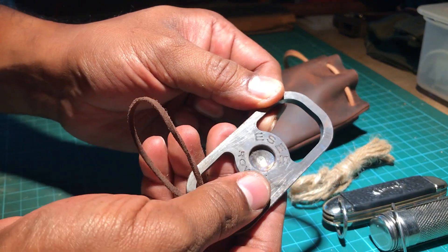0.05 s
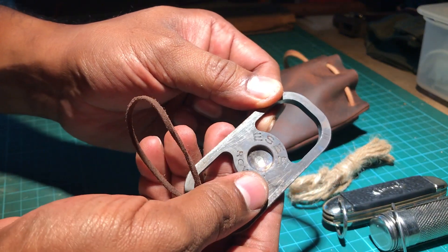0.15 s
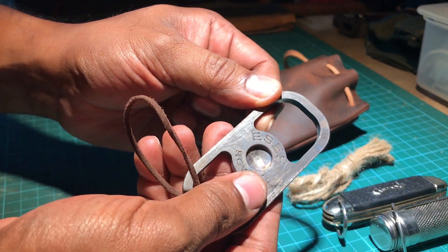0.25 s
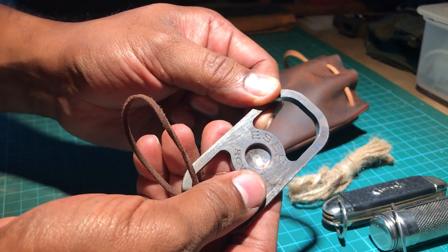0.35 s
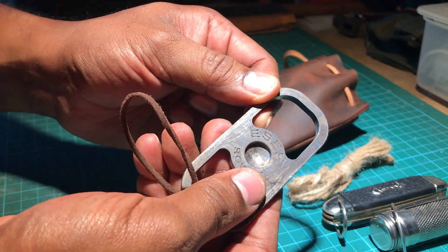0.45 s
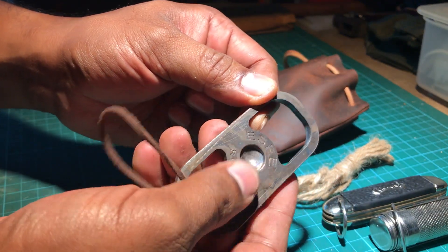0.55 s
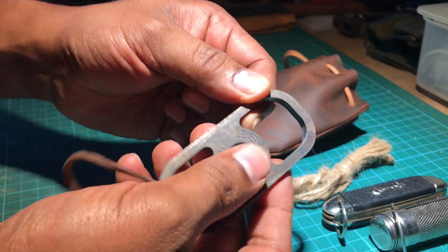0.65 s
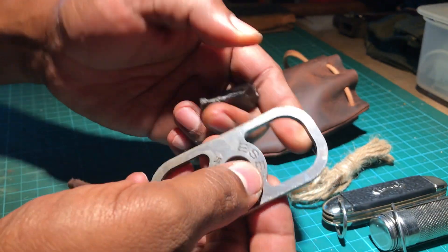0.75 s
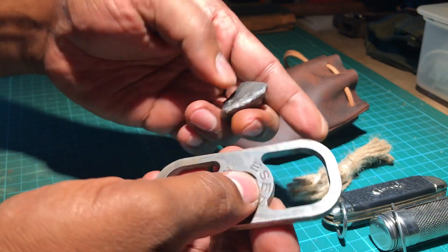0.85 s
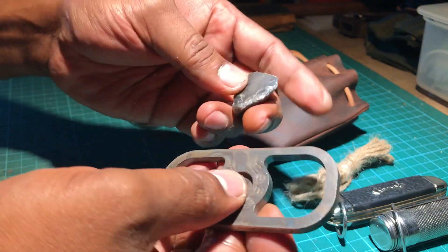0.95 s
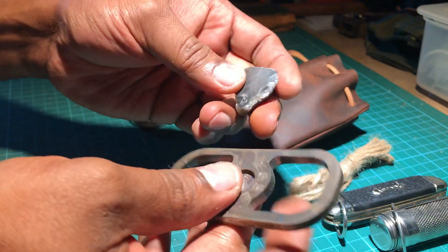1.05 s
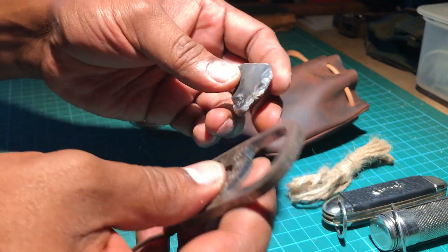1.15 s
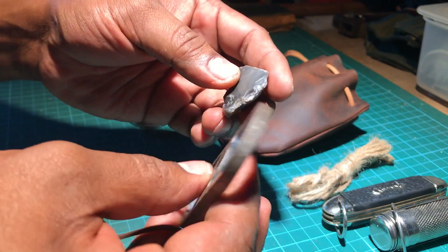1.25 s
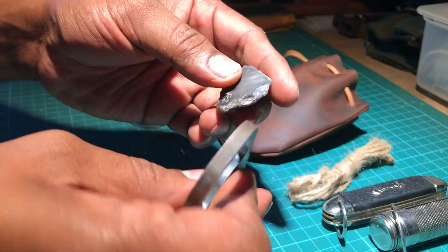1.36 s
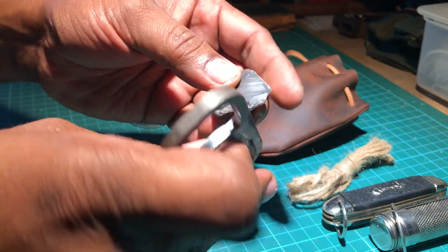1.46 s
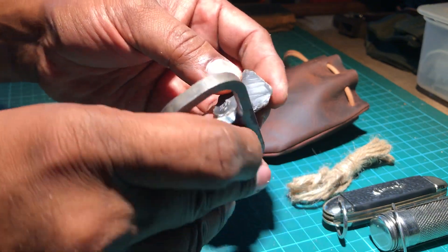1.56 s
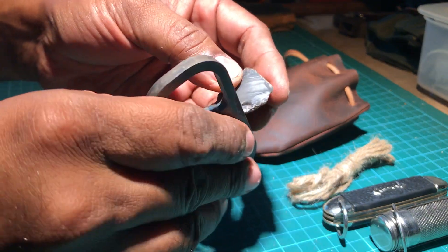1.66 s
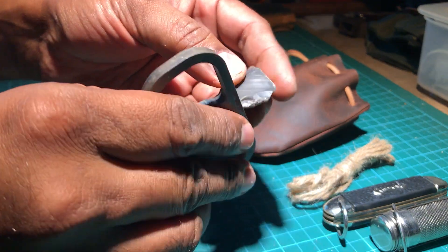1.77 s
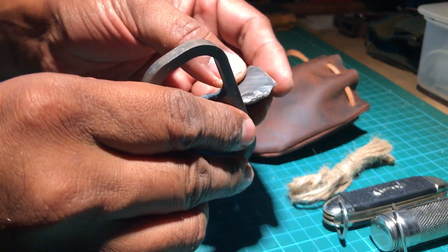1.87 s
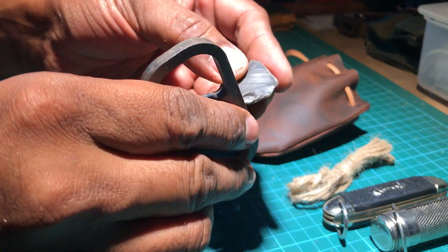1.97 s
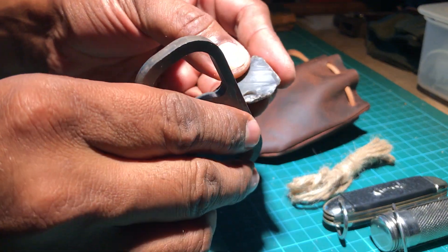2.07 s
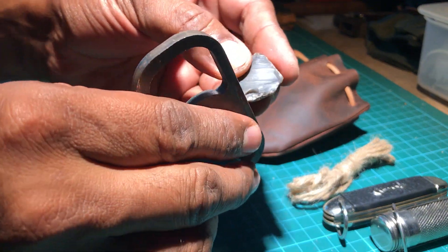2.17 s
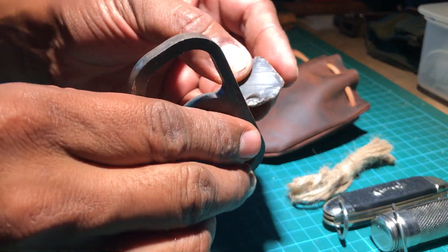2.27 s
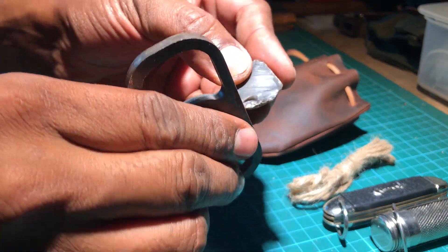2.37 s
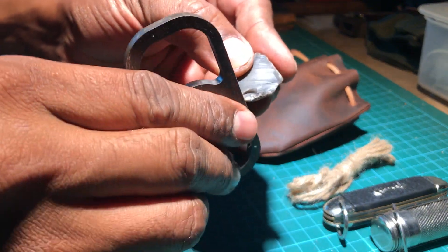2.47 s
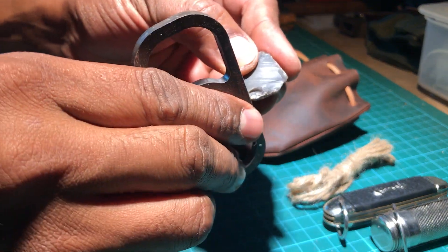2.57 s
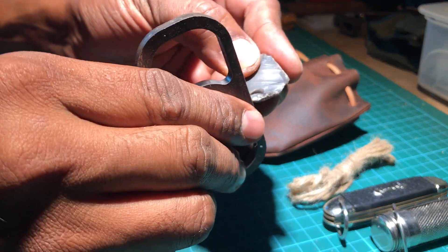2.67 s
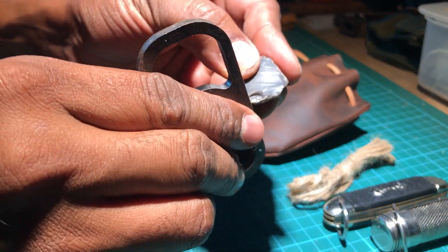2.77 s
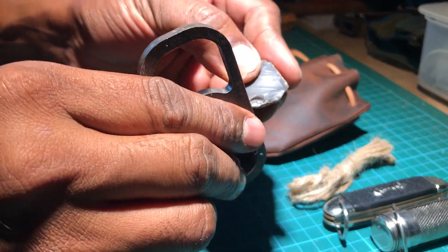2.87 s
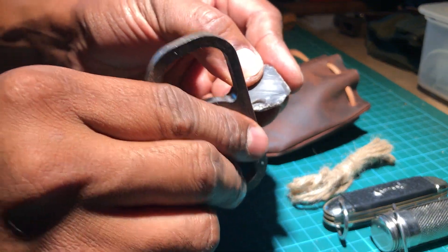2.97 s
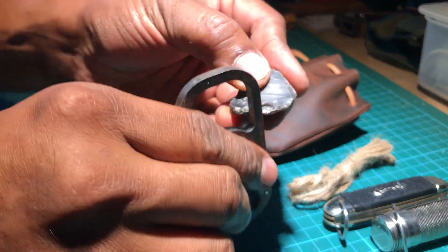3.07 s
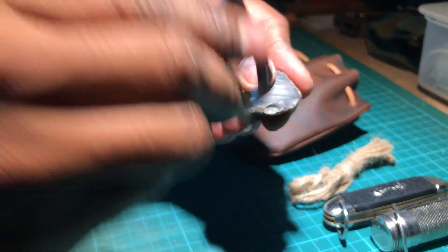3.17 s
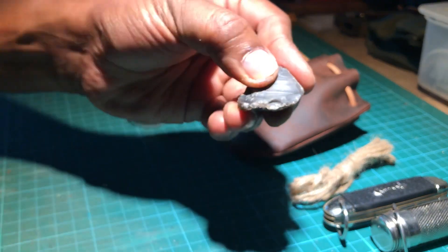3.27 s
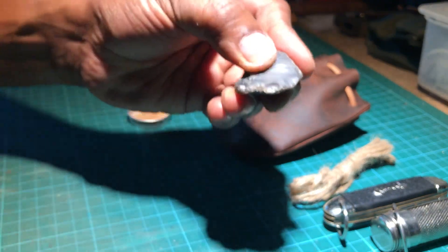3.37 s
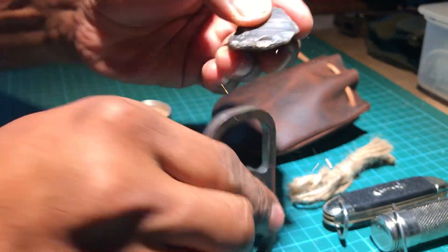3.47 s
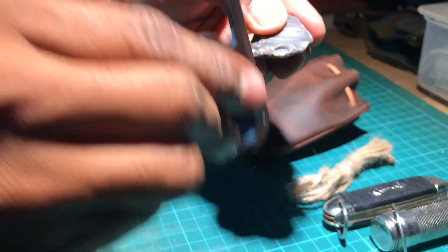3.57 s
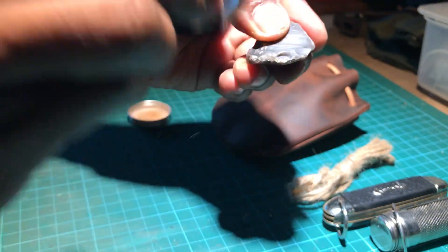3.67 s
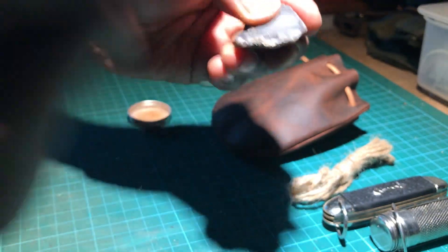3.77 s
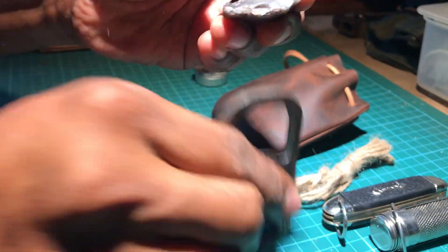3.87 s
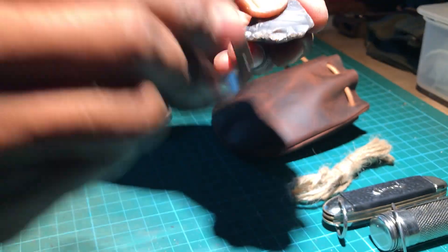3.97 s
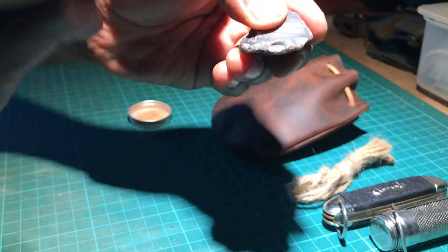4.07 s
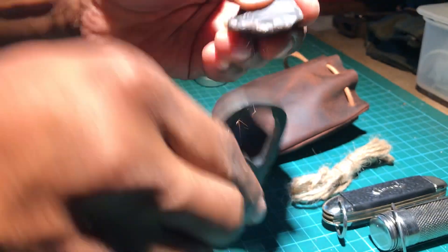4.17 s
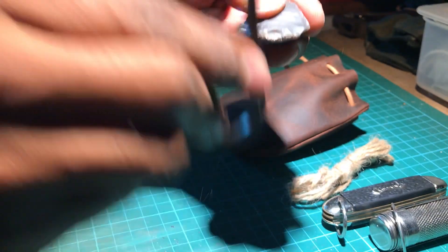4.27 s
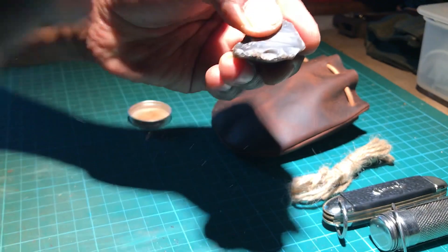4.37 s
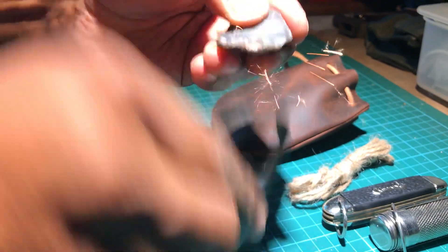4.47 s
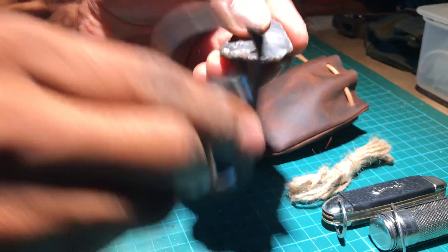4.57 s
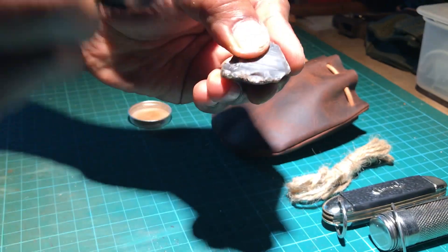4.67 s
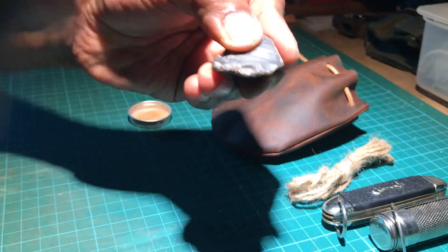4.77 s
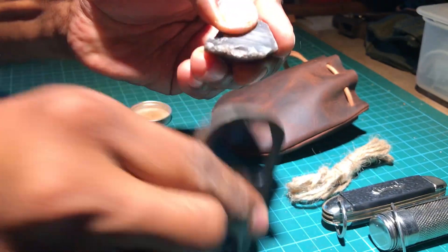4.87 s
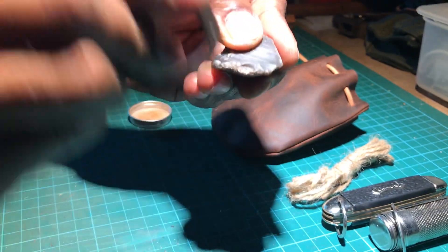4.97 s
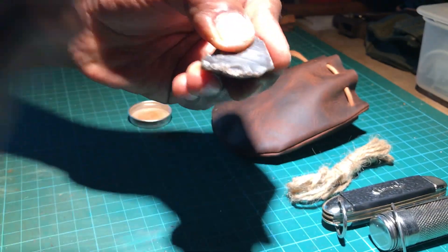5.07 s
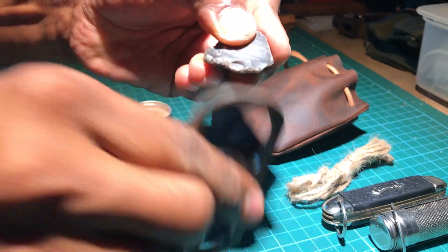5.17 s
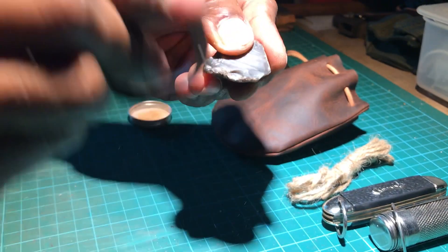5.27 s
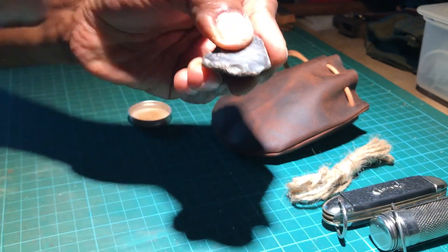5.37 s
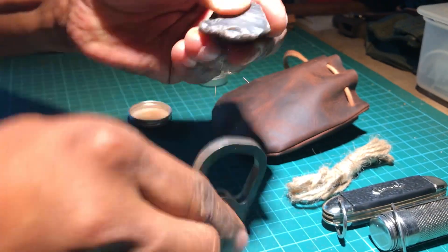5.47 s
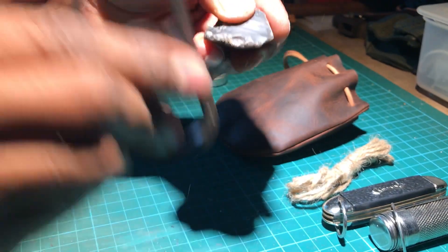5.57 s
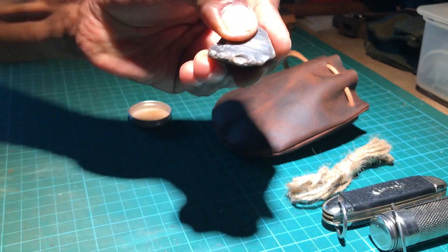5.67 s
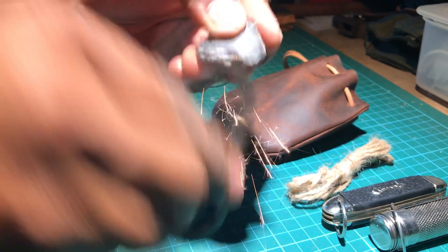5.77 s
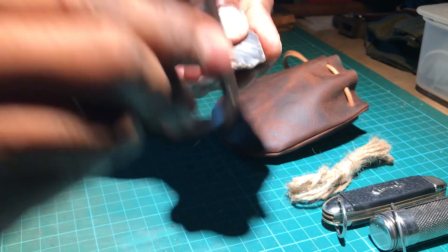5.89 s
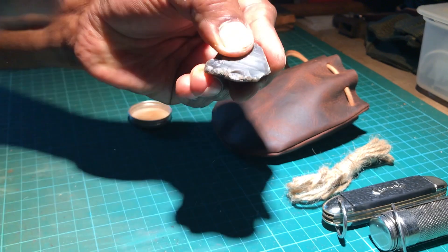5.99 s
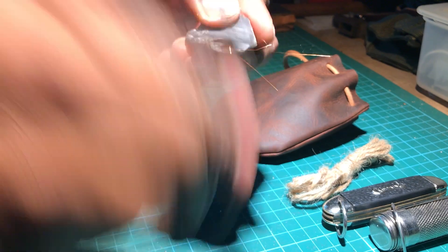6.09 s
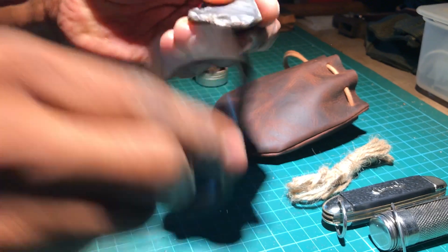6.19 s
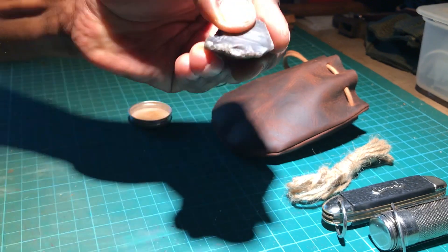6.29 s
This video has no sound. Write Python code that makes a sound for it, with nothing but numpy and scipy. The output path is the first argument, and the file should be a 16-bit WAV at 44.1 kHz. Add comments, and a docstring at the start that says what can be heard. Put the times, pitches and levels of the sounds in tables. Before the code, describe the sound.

A very close microphone in a small quiet room with a low rumble, faint hiss and tiny regular ticking. Hands shift softly, a steel striker touches a piece of flint with small clinks, then rubs it once briefly. After a short pause come nine loud, steady strikes, each a hard bright click with a gritty scrape and short metallic ring, fading quickly into slight room echo.

```python
"""Filtered noise gives a low rumble, faint hiss and thin wavering tones; short clicks give a regular tick.
From 0.6 s hands rustle (noise bursts); light touches of a steel striker on flint ring damped modes,
with a small room answering; at 3 s comes one slow rub (rough force under changing pressure).
From 3.5 s nine close strikes bite, scrape and snap free, with a thud and then a lump of moving air.
A limiter holds the peaks throughout."""
import sys
import numpy as np
from scipy import signal
from scipy.io import wavfile
from scipy.ndimage import uniform_filter1d, minimum_filter1d

SR = 44100
rng = np.random.default_rng(int(sys.argv[2]) if len(sys.argv) > 2 else 0)


def unload_wav(signal):
    """Save mono or channel-first audio to the path in sys.argv[1] as 16-bit WAV at rate SR, clipped to [-1, 1]."""
    wavfile.write(
        sys.argv[1],
        SR,
        np.round(np.clip(np.atleast_2d(signal).T, -1, 1) * 32767).astype(np.int16),
    )


N = 279153
SPAN = 8192  # samples in a mode response or grit

# Low rumble spectrum. Each row: frequency in Hz, relative density in dB per Hz.
RUMBLE_SPECTRUM = [(15, -62), (25, -32.5), (56, -2.5), (92, -1), (139, -5), (172, -16.5), (220, -4),
                   (231, -10.5), (252, -11.5), (340, -10.5), (384, -18.5), (429, -43.5), (480, -32),
                   (620, -67), (1060, -120)]
# Rumble level. Each row: time in seconds, rms level in dB.
RUMBLE_LEVEL = [(0, -51.5), (.4, -51.5), (1.2, -51), (1.8, -50.5), (2.8, -54), (3.6, -52), (4.4, -55),
                (5.05, -56), (6.33, -50.5)]
# Hiss spectrum. Each row: frequency in Hz, relative density in dB per Hz.
HISS_SPECTRUM = [(240, -35.5), (400, -3.5), (425, -7), (879, -8), (1180, -8), (1840, -17.5), (2360, -17),
                 (2590, -18.5), (3470, -20.5), (4950, -27.5), (6950, -29), (7750, -31.5), (15300, -34),
                 (16000, -41)]
HISS_DB = -63.5
# Tick colour. Each row: frequency in Hz, gain in dB.
TICK_COLOUR = [(3000, -25), (6000, -15), (9000, -2.5), (13000, -1), (16000, -7)]
TICK_START_S, TICK_EVERY_S = .0102, .1024
TICK_DB, TICK_SPREAD_DB = -52, 2.5
# Faint wavering tone: centre in Hz, width in Hz.
WHINE_TONE = (3430, 14)
# Its level. Each row: time in seconds, rms level in dB.
WHINE_LEVEL = [(0, -113), (.8, -79), (1.4, -83), (2.1, -78.5), (3.2, -81.5), (3.499, -91), (6.33, -94.5)]
# Lower tone that joins for a while: centre in Hz, width in Hz.
LOW_WHINE_TONE = (2920, 14)
# Its level. Each row: time in seconds, rms level in dB.
LOW_WHINE_LEVEL = [(2.2, -100), (2.27, -75), (2.7, -86), (3.0, -100)]
# Skin and cord sliding. Each row: frequency in Hz, relative density in dB per Hz.
RUSTLE_SPECTRUM = [(2350, -31), (4000, -4), (4930, 0.5), (5570, 2.5), (9220, 1), (10300, -6), (14800, 4),
                   (16000, 3.5)]
# Brief rustles. Each row: peak time in seconds, e-fold fade in seconds, peak level in dB.
RUSTLE_EVENTS = [(.59, .04, -80), (.73, 0.063, -69.5), (.93, 0.095, -66.5), (1.04, 0.014, -73),
                 (1.2, 0.033, -65), (1.362, 0.026, -58), (1.5, 0.036, -66), (1.625, 0.03, -68),
                 (1.705, 0.031, -74), (1.775, 0.059, -65), (2.36, .12, -74)]
RUSTLE_RISE_PER_FADE = 0.67

# Modes of the steel, one frequency in Hz per entry.
STEEL_HZ = [2285, 2680, 3180, 4045, 4765, 5380, 5762, 6330, 6695, 6920, 7070, 7250, 7420, 7845, 8450, 9680,
            10683, 12555, 12950, 14625, 15120]
# The same modes, hand-held. Each row: t60 in seconds at looseness 1, blow and scrape level in dB,
# dB added as the edge snaps free.
STEEL_MODES = [(0.022, -5, -14.5), (0.013, -4.5, -16), (0.03, -15, -6.5), (0.022, -18.5, 6),
               (0.042, -8.5, -13.5), (.035, -24.5, -6), (0.078, -12, -9), (0.039, -27, -9),
               (0.021, -1, -12.5), (0.023, -6.5, 8.5), (0.044, -5, 6.5), (0.033, -6.5, 1), (0.024, -15, 4),
               (0.0047, -14, -4.5), (0.01, -32.5, 0.5), (0.011, -27.5, -7), (0.057, -14.5, -7),
               (0.024, -7.5, -3.5), (0.042, -16.5, -7.5), (0.013, -11.5, -10), (0.034, -21, -11)]
# Centres of the mode families, in Hz.
FAMILY_HZ = [2290, 2680, 4400, 5760, 6690, 7150, 10680, 12800, 14800]
# Light touches. Each row: time in seconds, force in dB, share of stone in dB, looseness as a factor on
# ring time, favoured pitch in Hz, boost there in dB.
TAP_EVENTS = [(.829, -76, 4, 3, 10680, 22), (1.208, -79, -2, 2.5, 7170, 30.5),
              (1.351, -66, 3, 9.3, 12500, 30), (1.52, -82, -5, 4.5, 12500, 30),
              (1.7048, -44, 8, 1.3, 4045, 12), (1.7136, -62, 15.5, 0.86, 2680, 9),
              (1.7397, -60.5, 7, .81, 2400, 5), (1.765, -64, 5, 0.7, 2290, 12),
              (1.77, -57.5, 9.5, 1.2, 10680, 16), (1.779, -70, 8, .9, 10680, 9),
              (1.947, -73, 11, 2.5, 2400, 13), (2.03, -80, 3, 1.5, 6700, 8), (2.23, -79, -5, 4.2, 6700, 12),
              (2.38, -76, 2, 1.5, 7100, 9), (2.458, -75, 13, 1.7, 4400, 10),
              (2.508, -74.5, -8, 3, 2325, 18), (2.8, -74, 4, 2.7, 2290, 13),
              (2.841, -72.5, 4, 1.5, 2290, 15)]
# Dull clack of a light touch. Each row: frequency in Hz, gain in dB.
TOUCH_COLOUR = [(880, -65), (1500, -31), (2590, 9), (4080, 4), (4420, -10), (6890, -2), (8080, -16),
                (15200, -22), (16000, -46)]
TAP_DB_PER_OCTAVE = -3  # soft touches favour low modes
FOCUS_OCTAVES = .06
DESK_DB, DESK_T60_S = -16, 0.053  # early echoes from desk and hands
# Room decay. Each row: frequency in Hz, t60 in seconds.
ROOM_T60 = [(1000, 0.29), (2500, 0.21), (5000, 0.25), (7000, 0.24), (10000, 0.22), (15000, 0.19)]
ROOM_DB = -15
FAR_DB, FAR_SLOWER = -28.5, 4.1  # weak late echo; factor on t60

# One rub of steel on stone. Each row: time in seconds, pressure in dB.
RUB_PRESSURE = [(2.999, -94), (3.025, -61), (3.045, -52), (3.06, -49.5), (3.075, -46), (3.092, -43),
                (3.11, -54.5), (3.13, -65), (3.17, -94)]
# Its level in dB for each mode family.
RUB_FAMILY_DB = [1, -4, -29, -26, -13, -10.5, -10.5, -23, -6]
# Dry hiss of the grain. Each row: frequency in Hz, gain in dB.
RUB_COLOUR = [(710, -36.5), (1200, -16), (2790, 0.5), (3740, -14.5), (4130, -12.5), (5650, -14),
              (6950, -12.5), (13200, -29), (15200, -10), (16000, -43)]

# Strikes. Each row: time in seconds, force in dB, scrape length in seconds, change over the scrape in dB,
# snap in dB, grip looseness as a factor on ring time, mode left free by the grip in Hz, push of air in dB,
# steps from the middle along the edge, steps across it, steps of tilt.
STRIKE_EVENTS = [(3.4938, -17.5, 0.016, -20, -19, 1.04, 2285, -56, 0.33, -1.84, -0.95),
                 (3.8679, -17, 0.023, -19.5, -24.5, 0.53, 6695, -59.5, 1, -0.098, 0),
                 (4.204, -22, 0.02, -10.5, -5.5, 0.88, 12555, -46, 2.5, -1.4, -0.55),
                 (4.5177, -22.5, 0.018, -0.5, -4.5, 0.81, 2680, -46, -0.18, 1.2, 1.7),
                 (4.8755, -20.5, 0.0094, -0.5, -2.5, 0.66, 2285, -46.5, 0.83, -1.6, -1.3),
                 (5.166, -25, 0.02, -0.5, 7, 0.65, 12500, -43, -0.4, 1.56, 2.3),
                 (5.504, -25.5, 0.01316, 4, -1.5, 0.57, 5762, -48, 1.1, -1.4, -2.5),
                 (5.8226, -22.5, 0.021, -10.5, -3, 0.45, 7100, -38, 1.5, 0.16, 1.2),
                 (6.1537, -20, 0.013, -0.5, -6.5, 0.68, 2680, -45.5, -0.55, 1.2, 1.9)]
# Place of a blow, a row per mode family. Each row: level at the middle in dB, dB per step along,
# dB per step across, dB per step of tilt.
SPOT_DB = [(4.94, -11, 0, -2.55), (-2, 5, 2.7, -0.4), (1, -3, -8, 6.5), (2.5, 0.5, 6.5, -4.5),
           (0.6, -1.6, 1.3, -3.7), (0.86, -0.7, 1.5, -0.56), (-7, 3.5, 6.5, 3), (-4, 4, 7, -3.3),
           (-2.5, 2.1, 0.5, 3.1)]
# Dead clack of the small stone. Each row: frequency in Hz, gain in dB.
FLINT_COLOUR = [(300, -47.5), (800, -21.5), (1500, -12), (2300, -5.5), (3500, -6), (5000, -7.5),
                (7000, 4.5), (8500, -6.5), (11500, -6.5), (13700, -7.5), (15000, -6), (20000, -16.5)]
STONE_DB = 14  # share of stone in a strike
FREE_DB, FREE_LONGER = 5.5, 0.61  # free mode: boost, added share of ring time
AIR_LATE_S, AIR_WIDTH_S = 0.043, .022  # the hand's air follows the blow
JOLT_DB = -51

# Overall tone, with a steep treble roll-off. Each row: frequency in Hz, gain in dB.
TONE_RESPONSE = [(0, 0), (15550, 0), (15850, -20), (17100, -30), (22050, -40)]
EDGE_HZ = 17100


def amp(db):
    """dB to gain."""
    return 10 ** (np.asarray(db) / 20)


def evened(x):
    """Scales to rms 1."""
    return x / np.sqrt(np.mean(x ** 2) + 1e-20)


def read(points, hz):
    """Interpolates a spectrum on a log-frequency axis."""
    f, value = np.transpose(points)
    return np.interp(np.log(hz + 1), np.log(f + 1), value)


def level(points):
    """Gain at every sample from (s, dB) points."""
    return amp(np.interp(np.arange(N) / SR, *np.transpose(points)))


def add(mix, s, sound):
    """Mixes a sound in at time s."""
    part = mix[round(s * SR):][:len(sound)]
    part += sound[:len(part)]


def filtered(x, order, hz, kind):
    """Butterworth filter."""
    return signal.sosfilt(signal.butter(order, hz, kind, fs=SR, output="sos"), x)


def noise(spectrum, patchy_db, size=1024, bins=16, frames=6):
    """Random short-time spectra with drifting patches, rms 1."""
    hz = np.fft.rfftfreq(size, 1 / SR)
    a, b, patches = rng.standard_normal((4 * N // size + 5, len(hz), 3)).T
    patches = uniform_filter1d(patches, bins, axis=0)
    patches = evened(uniform_filter1d(patches, frames, axis=1))
    z = (a + 1j * b) * amp(read(spectrum, hz)[:, None] + patchy_db * patches)
    return evened(signal.istft(z, nperseg=size, noverlap=3 * size // 4)[1][:N])


def rumble():
    """Low noise in fine, slowly drifting bands, heard as wavering hums."""
    return level(RUMBLE_LEVEL) * noise(RUMBLE_SPECTRUM, 3.0, size=4096, bins=2, frames=10)


def hiss():
    """Nearly steady noise."""
    return amp(HISS_DB) * noise(HISS_SPECTRUM, 0.4)


def clack(colour):
    """Minimum-phase click with this colour: energy as early as causality allows."""
    hz = abs(np.fft.fftfreq(2048, 1 / SR))
    log_gain = np.log(amp(np.maximum(read(colour, hz), -100)))
    return np.fft.ifft(np.exp(np.conj(signal.hilbert(log_gain)))).real[:1024]


def ticks():
    """Evenly spaced clicks of slightly varying level."""
    out = np.zeros(N)
    for s in np.arange(TICK_START_S, N / SR, TICK_EVERY_S):
        tick_db = TICK_DB + TICK_SPREAD_DB * rng.standard_normal()
        add(out, s, amp(tick_db) * clack(TICK_COLOUR))
    return out


def whine(tone, level_points):
    """Noise in one narrow resonance, so the tone wavers."""
    hz, width_hz = tone
    r = np.exp(-np.pi * width_hz / SR)
    poles = [1, -2 * r * np.cos(2 * np.pi * hz / SR), r * r]
    return level(level_points) * evened(signal.lfilter([1], poles, rng.standard_normal(N)))


def rustle():
    """Sliding skin and cord: noise under exponential rises and fades."""
    t = np.arange(N) / SR
    envelope = np.zeros(N)
    for s, fade_s, db in RUSTLE_EVENTS:
        rise_s = RUSTLE_RISE_PER_FADE * fade_s
        envelope += amp(db) * np.exp(np.minimum((t - s) / rise_s, (s - t) / fade_s))
    return envelope * noise(RUSTLE_SPECTRUM, 1.6)


def near(hz):
    """1 for modes at this pitch, falling to 0 away from it."""
    return np.exp(-(np.log2(np.array(STEEL_HZ) / hz) / FOCUS_OCTAVES) ** 2)


def ring(hz, t60, db):
    """Click response of dying sines, energies in dB; alternate signs make close pairs swell and beat."""
    t = np.arange(SPAN)[:, None] / SR
    modes = amp(-60 * t / t60) * np.sin(2 * np.pi * hz * t)
    signs = (-1.) ** np.arange(len(hz))
    return modes @ (amp(db) * signs / np.linalg.norm(modes, axis=0))


def desk(x):
    """Adds a short dense burst of echoes, new for each contact."""
    t = np.arange(SPAN) / SR
    echoes = rng.standard_normal(SPAN) * amp(-60 * t / DESK_T60_S) * (t > .0015)
    echoes /= np.linalg.norm(echoes)
    return x + amp(DESK_DB) * signal.fftconvolve(x, echoes)[:len(x)]


def contact(force, snap, stone_db, loose, spot_db, colour):
    """Force rings steel and stone; the snap favours other modes of the steel."""
    hz = np.array(STEEL_HZ)
    t60, db, snap_db = np.transpose(STEEL_MODES)
    body = ring(hz, loose * t60, db + spot_db)
    freed = ring(hz, loose * t60, db + spot_db + snap_db)
    out = signal.fftconvolve(force, body) + signal.fftconvolve(snap, freed)
    stone = signal.fftconvolve(force + .2 * snap, clack(colour))
    add(out, 0, amp(stone_db) * stone)
    return desk(out)


def taps():
    """Light touches: a two-sample push rings the steel, mostly near one pitch, and clacks the stone."""
    out, hz = np.zeros(N), np.array(STEEL_HZ)
    for s, force_db, stone_db, loose, near_hz, focus_db in TAP_EVENTS:
        push = amp(force_db) * np.array([10, 5])
        spot_db = TAP_DB_PER_OCTAVE * np.log2(hz / hz[0]) + focus_db * near(near_hz)
        add(out, s, contact(push, 0 * push, stone_db, loose, spot_db, TOUCH_COLOUR))
    return out


def room(x):
    """Sparse echoes dying band by band; three tails slowly cross-fade, so neighbouring blows echo differently."""
    out = np.zeros(N)
    turn = np.pi * np.arange(N) / SR / 1.05
    for k in range(3):
        echoes = np.zeros(SR // 2)
        at = np.arange(200, len(echoes) - 16, 16)
        at = at + rng.integers(0, 16, len(at))
        echoes[at] = rng.choice([-1., 1.], len(at))
        hz, t, z = signal.stft(echoes, SR, nperseg=256)
        fall_db = -60 * t / read(ROOM_T60, hz)[:, None]
        fall = amp(fall_db) + amp(FAR_DB + fall_db / FAR_SLOWER)
        tail = signal.istft(z * fall, SR, nperseg=256)[1]
        share = np.sqrt(2 / 3) * np.cos(turn + k * np.pi / 3)  # squares sum to 1
        out += signal.fftconvolve(x * share, tail / np.linalg.norm(tail))[:N]
    return amp(ROOM_DB) * out


def by_mode(family_db):
    """Interpolates family levels in dB over the modes."""
    return read(np.transpose([FAMILY_HZ, family_db]), np.array(STEEL_HZ))


def grit(length, spread_db):
    """Force of a rough edge: dense tiny catches, a few large; rms 1 over SPAN before the cut."""
    catches = rng.standard_normal(SPAN) * amp(spread_db * rng.exponential(1, SPAN))
    return evened(catches)[:length]


def rub():
    """Rough force under slowly changing pressure excites steel and grain."""
    s, db = np.transpose(RUB_PRESSURE)
    t = np.arange(s[0], s[-1], 1 / SR)[:SPAN]
    force = amp(np.interp(t, s, db)) * grit(len(t), 2.8)
    out = np.zeros(N)
    add(out, s[0], contact(force, 0 * force, 10.0, 0.64, by_mode(RUB_FAMILY_DB), RUB_COLOUR))
    return out


def strikes():
    """Bite, scrape and snap as forces; place and grip set the balance of modes."""
    out, t = np.zeros(N), np.arange(2048) / SR
    for s, force_db, length_s, fade_db, snap_db, loose, free_hz, _, *place in STRIKE_EVENTS:
        lift = np.exp(-np.maximum(t - length_s, 0) / 0.00021)  # the edge leaves the steel
        force = grit(len(t), 3.8) * amp(fade_db * t / length_s) * lift
        force[0] += 11.  # first bite
        snap = 4.05 * grit(len(t), 0.76) * np.exp(-((t - length_s) / 0.0017) ** 2)
        snap[round(length_s * SR)] += 18.  # the last burr tears off
        snap *= amp(snap_db)
        free = near(free_hz)
        spot_db = by_mode(np.dot(SPOT_DB, [1, *place])) + FREE_DB * free
        mode_loose = loose * (1 + FREE_LONGER * free)
        add(out, s, amp(force_db) * contact(force, snap, STONE_DB, mode_loose, spot_db, FLINT_COLOUR))
    return out


def jolts():
    """The fingers take a jolt at each strike: a brief dull thud of band noise."""
    out, t = np.zeros(N), np.arange(4096) / SR
    for s, *_ in STRIKE_EVENTS:
        thud = evened(filtered(rng.standard_normal(len(t)), 2, [200, 720], "band"))
        add(out, s, amp(JOLT_DB) * thud * np.exp(-t / 0.0069) * (1 - np.exp(-t / 0.0032)))
    return out


def air_pushes():
    """Air moved by the hand: a Gaussian lump of bass noise after each strike."""
    out, t = np.zeros(N), np.arange(4096) / SR
    middle = t.mean()
    for s, *_, air_db, along, across, tilt in STRIKE_EVENTS:
        air = evened(filtered(rng.standard_normal(len(t)), 2, [30, 180], "band")) / 2
        lump = np.exp(-((t - middle) / AIR_WIDTH_S) ** 2)
        add(out, s + AIR_LATE_S - middle, amp(air_db) * air * lump)
    return out


def scene():
    """Background, steel on stone with its room, thuds and air."""
    background = rumble() + hiss() + ticks() + rustle()
    background += whine(WHINE_TONE, WHINE_LEVEL) + whine(LOW_WHINE_TONE, LOW_WHINE_LEVEL)
    close = filtered(taps() + rub() + strikes(), 2, 1500, "high")  # small bodies radiate no bass
    return (background + close + room(close) + jolts() + air_pushes())[None]


def record(dry):
    """Steep treble roll-off above 15.5 kHz, deep bass cut, quick peak limiter, band limit."""
    hz, db = np.transpose(TONE_RESPONSE)
    x = signal.oaconvolve(dry[0], signal.firwin2(601, hz, amp(db), fs=SR), "same")
    x = filtered(x, 3, 42, "high")
    peak_db = 20 * np.log10(-minimum_filter1d(-abs(x), size=41) + 1e-9)
    fall_db = np.arange(N) * 5400.0 / SR  # recovery, 5400 dB/s
    held_db = np.maximum.accumulate(peak_db + fall_db) - fall_db
    over_db = np.maximum(held_db + 3.4, 0)  # threshold -3.4 dB
    x = x / amp(uniform_filter1d(over_db, size=41))
    band_limit = signal.firwin(511, EDGE_HZ, window=("kaiser", 9), fs=SR)
    return signal.oaconvolve(x, band_limit, "same")[None]


dry = scene()
out = record(dry)
unload_wav(out)
```